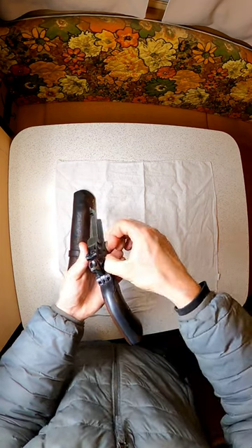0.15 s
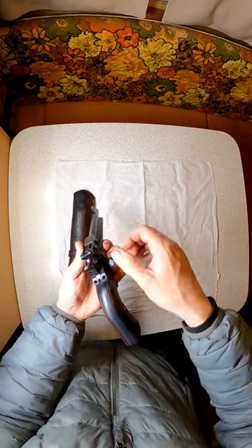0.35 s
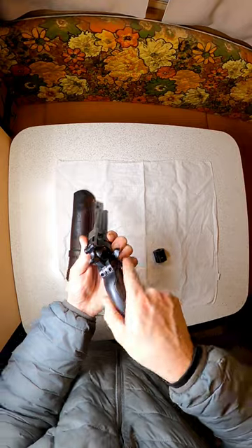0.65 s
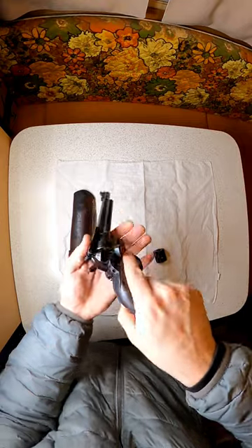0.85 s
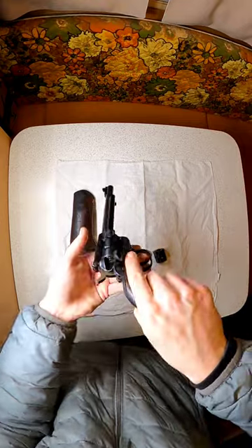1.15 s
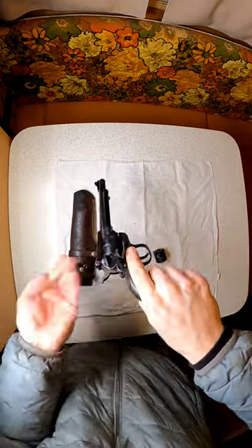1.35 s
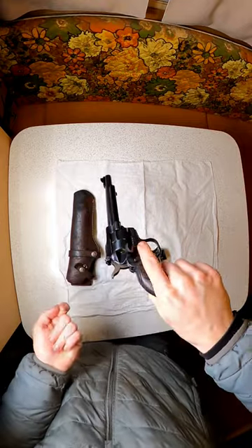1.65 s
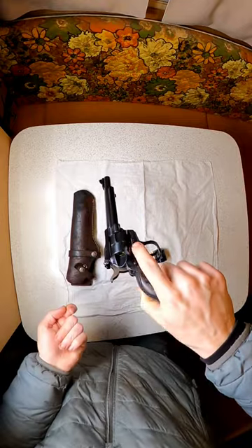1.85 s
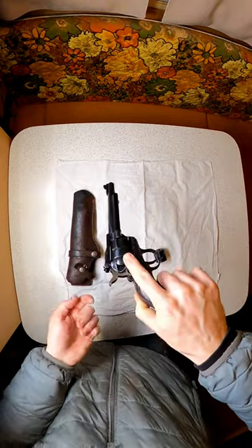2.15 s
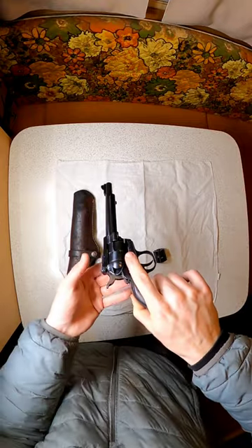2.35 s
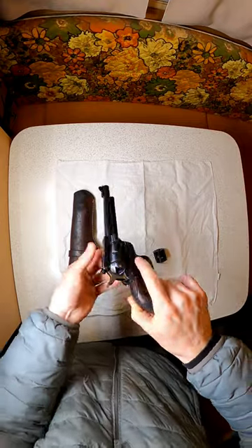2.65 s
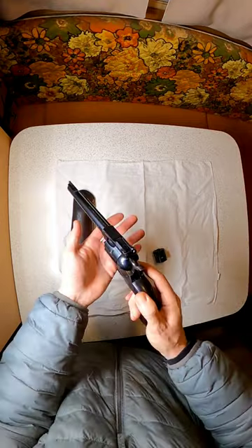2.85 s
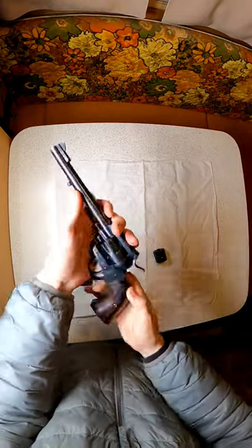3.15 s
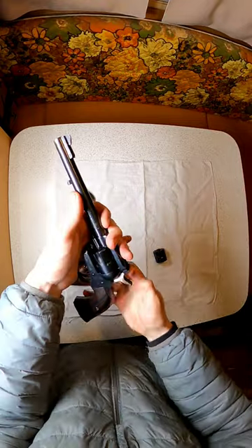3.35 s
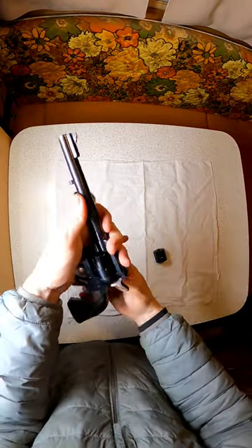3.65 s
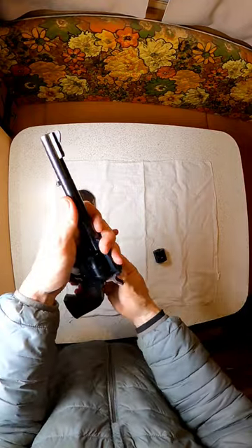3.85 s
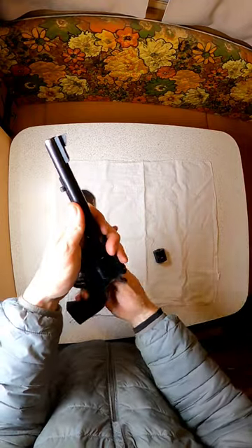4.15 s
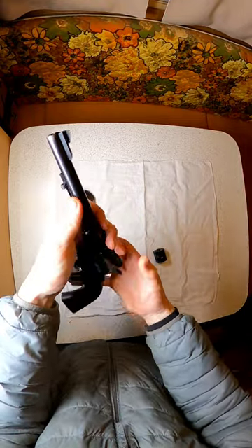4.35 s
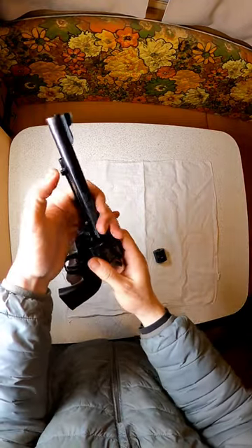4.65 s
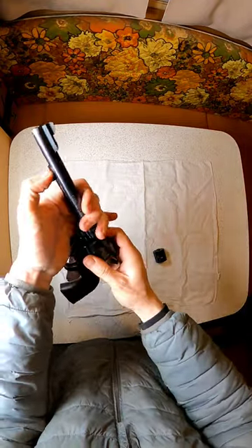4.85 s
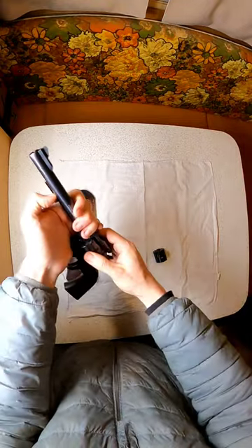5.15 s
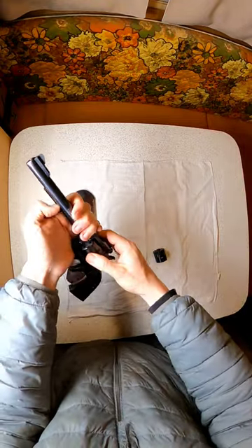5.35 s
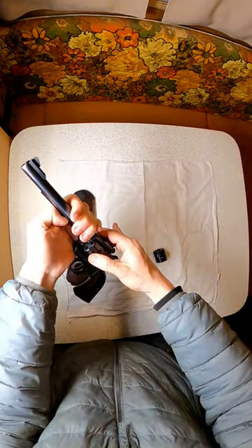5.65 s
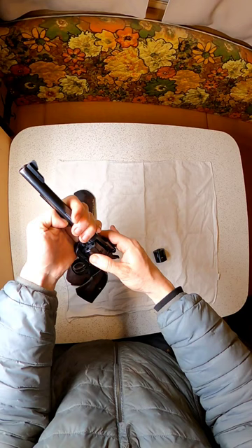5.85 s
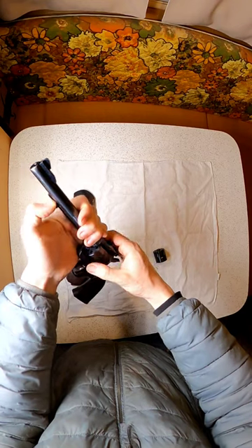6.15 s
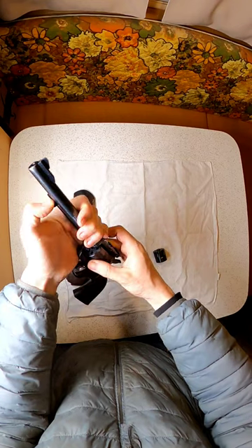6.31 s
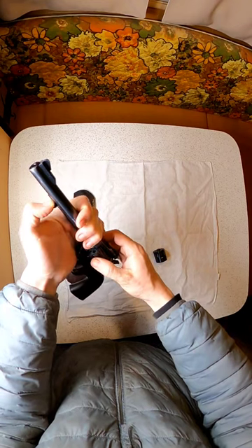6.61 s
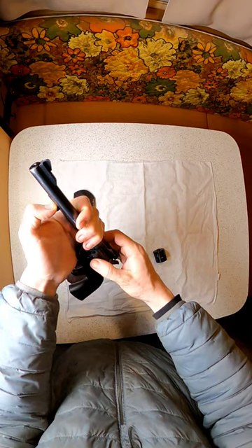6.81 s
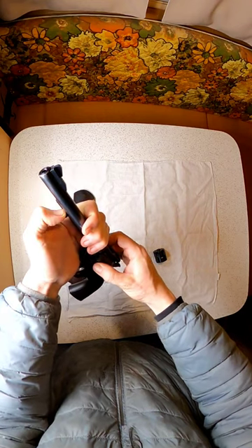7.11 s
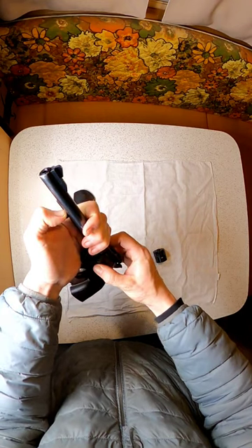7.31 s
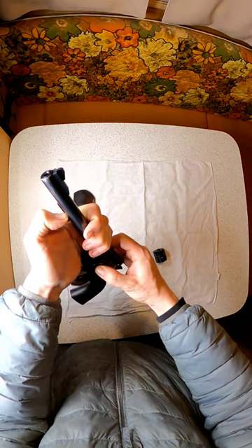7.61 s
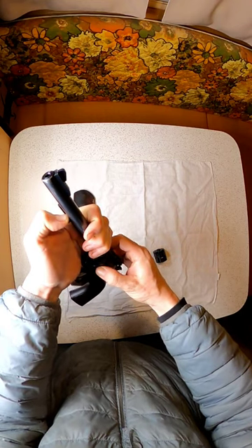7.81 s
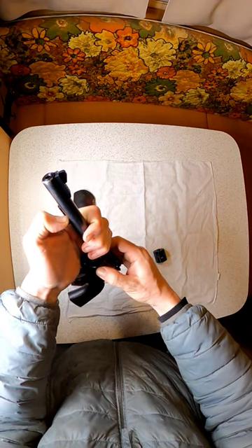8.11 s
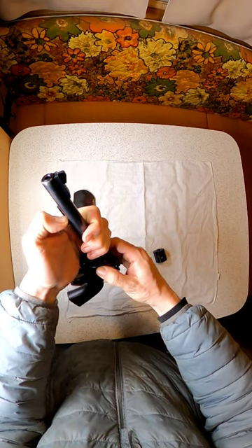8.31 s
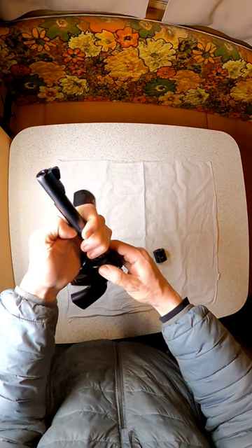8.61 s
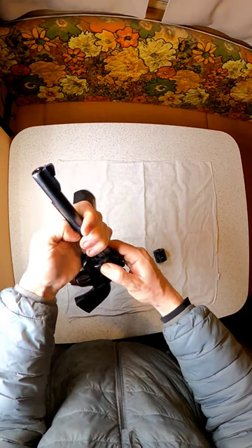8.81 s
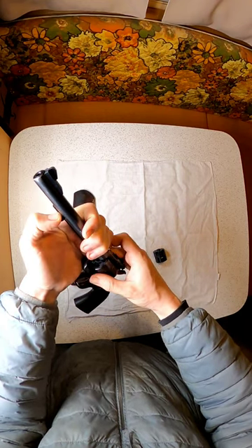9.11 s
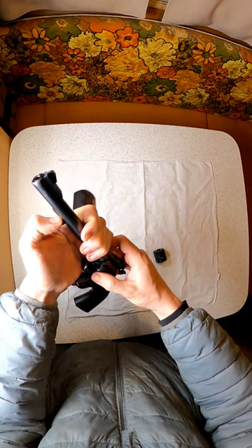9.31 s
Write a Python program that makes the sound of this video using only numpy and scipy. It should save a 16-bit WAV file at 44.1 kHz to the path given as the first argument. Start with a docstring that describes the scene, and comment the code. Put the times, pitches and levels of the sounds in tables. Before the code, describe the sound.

A revolver's cylinder spins with rapid ticks, then its steel action snaps and clicks close by, amid soft sleeve rustles and table knocks.

```python
"""Padded sleeves rustle, then a revolver's cylinder is spun and ticks against its pawl as it coasts.
The single-action gun is handled over a table in a small, soft room, close to a head-worn stereo microphone.
Sprung steel parts snap home and ring, fingers squeak on the metal, hard knocks set the table top booming.
Behind it an engine drones through the walls, over street rumble, a rush of air and an appliance's hum."""
import sys
import numpy as np
from scipy import signal
from scipy.fft import rfft, irfft, next_fast_len
from scipy.io import wavfile
from scipy.ndimage import map_coordinates

SR = 44100
rng = np.random.default_rng(int(sys.argv[2]) if len(sys.argv) > 2 else 0)


def wav_out(sig):
    """Save sig, one row per channel (or a flat mono array), as 16-bit PCM at SR to the path in sys.argv[1]."""
    wavfile.write(sys.argv[1], SR, np.round(np.clip(np.atleast_2d(sig).T, -1, 1) * 32767).astype(np.int16))


N = 417627
HIT_SAMPLES = 16384
# stereo width of the noises and the table's clatter: frequency_hz, side_minus_mid_db
SCENE_WIDTH = [(100, -12.5), (600, -17), (1200, -6.5), (2500, -1.5), (5000, -5), (8000, -3.5),
               (13000, -3.5)]


def ratchet(pawl_db=5.5, scatter_db=1.5):
    """The pawl drops into each passing notch: weaker, thinner and crisper as the cylinder slows."""
    # the cylinder is flicked up to speed and coasts: time_s, notches_per_s
    spin = [(1.3617, 25.6), (1.4157, 97.7), (1.6, 33.15), (1.69, 5.5)]
    # the cylinder's modes: pitch_hz, level_db, t60_s
    cylinder_modes = [(2425, -10, 0.027), (3480, -13, .07), (3800, -8, 0.047), (4197, -7.5, 0.04),
                      (5007, -1, 0.023), (5400, -15, 0.042), (6390, 3.5, 0.046), (8050, -17.5, .07),
                      (8670, -3.5, 0.039), (11800, -10.5, 0.071)]
    out, steel = np.zeros((2, N)), steelwork()
    when, rate = np.transpose(spin)
    t = np.arange(when[0], when[-1], 1 / SR)
    speed = np.interp(t, when, rate)
    notches = np.cumsum(speed) / SR
    for i in np.searchsorted(notches, np.arange(notches[-1])):
        slowness = np.log10(rate.max() / speed[i])  # 0 at full speed, 1 at a tenth of it
        db = pawl_db - 1.5 * slowness + scatter_db * rng.standard_normal()
        edge_db, thin_db = -3.5 + 5 * slowness, 5 * slowness
        body = [(100, -24), (480, -21), (700, -6), (1250, -5), (2300, 2.5)]
        colour = [(hz, level - thin_db) for hz, level in body]
        colour += [(3000, -6.5), (4000, 5), (5200, edge_db - 3), (6500, edge_db), (8000, edge_db - 5),
                   (9300, edge_db + 1), (12500, edge_db - 12), (15000, -31)]
        crack = burst(t60=.007, hold_s=.0029)
        tick = click(colour, crack, [(cylinder_modes, -6)], steel, steel_db=-7, room_db=-20)
        add(out, t[i], amp(db) * tick)
    return out


def whirr():
    """The spinning cylinder rattles on its pin, a fine rasp between the pawl's ticks."""
    # the rattle's swell: time_s, level_db
    swell = [(1.375, -110), (1.405, -48.5), (1.485, -31.5), (1.585, -37.5), (1.66, -110)]
    rasp = noise([(500, -26), (3800, -1), (7000, -7.5), (15000, -32)], crinkle_db=4)
    return amp(curves(swell)[0]) * rasp


def action():
    """Gate, hammer and cylinder stop snap home and rebound twice, evenly spaced and ever weaker."""
    # sprung parts striking; body, edge and top shape the low mids, treble and high treble:
    # start_s, level_db, body_db, edge_db, top_db, contact_t60_s, pitch_hz, ring_db, flight_s, loss_db
    snaps = [(2.047, 10.5, -11.5, 5, -12, 0.0073, 2490, -8, .005, 31),
             (2.5243, 2, -3, 0.5, -8, .022, 2130, -11.5, 0.011, 18),
             (4.105, -8, 3, 14, 1.5, 0.0056, 2395, -5, 0.01, 12.5),
             (5.0385, -13.5, -2, -4, -16, 0.015, 2890, -10, 0.013, 8),
             (5.7585, 8, -4.5, -1, -28, 0.0099, 3310, -12, 0.011, 27),
             (5.762, 11.5, -8.5, -2.5, -18, .015, 3305, -13.5, 0.0096, 8),
             (6.645, 4.5, -8.5, 1, -3.5, 0.029, 3220, -8, 0.012, 12),
             (6.908, -10, -6.5, 0.5, -5.5, 0.0083, 7110, -10, 0.023, 17),
             (8.4212, -6, -3, -14, -35, .012, 3463, -21, .006, 22),
             (8.4275, -6, -1, -2.5, -16, .012, 2880, -18, 0.0091, 20),
             (8.489, 8.5, -4.5, -5, -18.5, .01, 6620, -16, 0.0091, 11),
             (8.504, 1, -13, 0, -24, .012, 2990, -10, 0.012, 13.5),
             (8.85, 11, -2, -2, -30.5, 0.029, 3380, -9, .0112, 1.5),
             (8.929, -8, 6.5, -18.5, -29, 0.095, 1400, -16, .01, 20),
             (9.0502, 1, 0, -16, -51, 0.021, 1650, -12.5, 0.0083, 9.5),
             (9.4613, 4.5, -13.5, -4.5, -8, 0.02, 3310, -11.5, 0.011, 20)]
    out = np.zeros((2, N))
    for start_s, db, body_db, edge_db, top_db, t60, pitch_hz, ring_db, flight_s, loss_db in snaps:
        colour = [(100, body_db - 11), (520, body_db - 13.5), (720, body_db - 2), (920, body_db - 7.5),
                  (1300, body_db + 2), (2200, 1), (3600, -1.1), (5200, edge_db - .5), (7400, edge_db),
                  (11000, top_db), (13000, top_db - 7.5), (15000, top_db - 24)]
        for bounce in range(3):
            at_s = start_s + bounce * flight_s
            if at_s < N / SR:
                add(out, at_s, amp(db - bounce * loss_db) * contact(colour, t60, pitch_hz, ring_db))
    return out


def ticks():
    """Faint, brief ticks; the one at 2.044 s is a short, bright lead-in to the loud snap."""
    # the ticks: start_s, level_db, pitch_hz
    tick_events = [(2.0034, -28, 2870), (2.029, -22, 2347), (2.0443, -9.5, 6230), (3.922, -30, 1940),
                   (5.0146, -20.5, 3050), (5.2678, -25.5, 3425), (5.5462, -21.5, 2560),
                   (5.673, -26.5, 7080), (6.373, -24, 3750), (8.732, -28, 3190), (8.841, -23, 3420)]
    # spectrum of a tick: frequency_hz, level_db
    colour = [(100, -17), (520, -18.5), (720, -8.5), (1300, -5.5), (2200, -1), (3600, 2.5), (5200, -7),
              (7400, -8.5), (11000, -22), (15000, -42.5)]
    out = np.zeros((2, N))
    for start_s, db, pitch_hz in tick_events:
        add(out, start_s, amp(db) * contact(colour, .012, pitch_hz, ring_db=-11))
    return out


def contact(colour, t60, pitch_hz, ring_db, frame_db=-16, part_t60=.019):
    """A struck part rings briefly and shakes the frame."""
    # the frame's modes: pitch_hz, level_db, t60_s
    frame_modes = [(695, 0.5, .07), (1370, -7, 0.058), (1840, -11.5, 0.064), (1766, -7.5, 0.12),
                   (2030, -15, .13), (2357, -8, 0.14), (2900, -2.5, 0.089), (3125, -2.5, 0.11),
                   (3460, -10, 0.085), (3460, -11.5, 0.087), (4190, -9.5, .09), (4400, -9, .1),
                   (6330, -9.5, .07), (6220, 1.5, 0.047), (6710, -6.5, 0.1), (6940, -3.5, .07)]
    steel = steelwork()  # each blow finds other modes in the gripped gun
    bodies = [(frame_modes, frame_db), ([(pitch_hz, 0, part_t60)], ring_db)]
    return click(colour, burst(t60), bodies, steel, steel_db=-10.5, room_db=-20.5)


def click(colour, crack, bodies, steel, steel_db, room_db):
    """Steel meets steel near the microphone: a crack, ringing steelwork and bodies, a faint room tail."""
    # stereo width of the gun: frequency_hz, side_minus_mid_db
    gun_width = [(100, -13), (600, -16.5), (1200, -7.5), (2200, -11.5), (4000, -8), (8000, -1.5),
                 (13000, -1.5)]
    shimmer = signal.fftconvolve(crack, steel, axes=1)[:, :HIT_SAMPLES]
    direct = crack + amp(steel_db) * shimmer / np.linalg.norm(shimmer[0])
    for modes, db in bodies:
        tone = ring(modes)
        mid_side = [[1], [rng.uniform(-1, 1)]]
        direct += amp(db) * tone / np.linalg.norm(tone) * mid_side
    ahead = amp([[0], [-6]])  # sound from straight ahead has less side than the room
    return stereo(direct * ahead + amp(room_db) * room_tail(), colour, gun_width)


def steelwork(t60=.07, count=80):
    """The many weak modes of barrel, pins and springs, as mid and side."""
    hz = 700 + 13000 * (np.arange(count) + rng.random(count))[:, None] / count
    t = np.arange(HIT_SAMPLES // 4) / SR
    modes = np.sin(2 * np.pi * hz * t) * amp(-60 * t / t60)
    return rng.choice([-1, 1], (2, count)) @ modes


def jolts():
    """The hand absorbs each jolt of the gun: one low push that dies at once."""
    # the pushes: start_s, level_db, length_s
    pushes = [(1.408, -30, 0.0025), (1.449, -35.5, 0.0035), (2.0485, -20, 0.0042), (2.524, -36.5, 0.0044),
              (8.876, -36.5, 0.0049)]
    out = np.zeros(N)
    for start_s, db, length_s in pushes:
        progress = np.arange(HIT_SAMPLES) / SR / length_s
        add(out, start_s, -amp(db) * np.sin(np.pi * progress) * np.exp(1 - 2 * progress))
    return out


def table_top(rise_s=.003):
    """Hard knocks set the table top booming; its dense upper modes merge into a short clatter."""
    # knocks that reach the table: start_s, boom_db, clatter_db
    knocks = [(5.763, -30.5, 5.5), (5.812, -52, -12.5), (8.85, -38, 9), (8.871, -30.5, 7),
              (8.931, -52, -6.5), (9.05, -37.5, 1)]
    # the top's low modes: pitch_hz, level_db, t60_s
    top_modes = [(172, 0, .46), (225, -1, .34), (379, -6, .21), (495, -14, .21), (660, -13, .2),
                 (980, -12, .23), (1152, -13, .19), (1373, -14, .15)]
    # spectrum of the clatter: frequency_hz, level_db
    clatter_colour = [(100, -18.5), (250, -1.5), (400, 5), (580, -9.5), (820, -5), (1100, 6), (2000, -0.5),
                      (4000, -10.5), (9000, -39.5)]
    out, t = np.zeros((2, N)), np.arange(HIT_SAMPLES) / SR
    for start_s, boom_db, clatter_db in knocks:
        clatter = amp(clatter_db) * stereo(burst(t60=.14) * [[1], [.5]], clatter_colour)
        boom = amp(boom_db) * ring(top_modes, scatter_db=.5)
        add(out, start_s, (boom + clatter) * (1 - np.exp(-t / rise_s)))
    return out


def finger_squeaks(jitter_hz=260):
    """A finger sticks and slips on the steel: a fuzzy, gliding squeak."""
    # skin sliding on steel: start_s, length_s, start_hz, end_hz, level_db
    slides = [(1.022, 0.12, 5000, 4200, -63), (1.104, 0.077, 4800, 7040, -69),
              (2.26, 0.098, 2800, 3730, -58), (2.352, 0.083, 3400, 3400, -67),
              (5.826, 0.155, 4650, 4550, -73.5), (5.967, 0.084, 3020, 3940, -64)]
    out = np.zeros(N)
    for start_s, length_s, start_hz, end_hz, db in slides:
        progress = np.linspace(0, 1, int(length_s * SR))
        hz = start_hz + (end_hz - start_hz) * progress + jitter_hz * wobble(900)[:len(progress)]
        squeak = np.sqrt(2) * np.sin(2 * np.pi * np.cumsum(hz) / SR)
        add(out, start_s, amp(db) * np.sin(np.pi * progress) * squeak)
    return out


def sleeves():
    """Padded nylon rubs and crinkles; each stroke swells and fades with the speed of the arm."""
    # arm strokes: start_s, length_s, rub_db, hiss_db
    strokes = [(0.25, 0.44, -63, -62.5), (0.54, 0.36, -58.5, -60), (0.802, .45, -63.5, -61.5),
               (1.156, 0.79, -70.5, -64), (2.11, .43, -60, -59), (2.665, 0.64, -57.5, -59),
               (3.06, 0.33, -71, -59.5), (3, 0.89, -53.5, -60.5), (3.721, 0.96, -67.5, -67),
               (4.39, 0.53, -56.5, -61), (4.749, 0.65, -61.5, -63), (5.25, 0.78, -66.5, -65),
               (5.91, 0.27, -74.5, -66), (6.26, 0.71, -78.5, -73), (7.591, 0.73, -65, -73),
               (8.506, 0.68, -65.5, -62.5)]
    # spectra of the rubbing and the nylon's hiss: frequency_hz, level_db
    rub_colour = [(150, -30.5), (400, -3), (750, -6.5), (1100, -0.5), (1700, -1.5), (2500, -6.5),
                  (4000, -21.5), (9000, -51.5)]
    hiss_colour = [(800, -30.5), (2000, -1), (3300, 1.5), (5000, -0.5), (6500, 1.5), (8600, -8),
                   (9700, -14), (12800, -18.5), (14000, -45.5)]
    power = np.zeros((2, N))
    for start_s, length_s, rub_db, hiss_db in strokes:
        add(power, start_s, amp([[rub_db], [hiss_db]]) ** 2 * np.hanning(int(length_s * SR)))
    resting = amp([[-67], [-78]])  # rub and hiss between strokes
    rub, hiss = np.sqrt(power + resting ** 2) * amp(2.2 * wobble(22))
    return rub * noise(rub_colour) + hiss * noise(hiss_colour, crinkle_db=1)


def engine():
    """Four low firing orders pass the walls; they swell and sink as the revs rise, sag and settle."""
    # the engine outside: time_s, firing_hz, firing_db, overtone_db
    revs = [(.7, 54.2, -71.5, -79.5), (1.2, 53.16, -70.5, -56), (1.45, 50.4, -65, -55),
            (2.2, 55, -55.5, -52), (2.58, 56.57, -42.5, -42.5), (2.72, 57.19, -54, -47.5),
            (2.81, 56.9, -61, -59), (2.97, 57.55, -57, -46.5), (3.2, 58.32, -82, -45.5),
            (3.55, 56.77, -49.5, -43.5), (3.9, 53.07, -38.5, -39.5), (4.3, 48.54, -52.5, -42.5),
            (4.6, 44.94, -75.5, -46), (5.1, 42.58, -54, -50.5), (5.5, 41.3, -70, -55),
            (5.7, 41.05, -73.5, -71.5), (6.08, 40.27, -65.5, -53), (6.3, 39.4, -66, -71),
            (7.45, 40, -66, -76.5), (7.6, 41, -52, -71.5), (8.45, 40.6, -51, -59.5), (8.8, 40.27, -70, -77)]
    # second, third and fourth order: offset_db
    overtones = [0, -3, -3.2]
    # the room's low resonances, through which the overtones sweep: frequency_hz, gain_db
    room_gain = [(78, 5), (85, 5.5), (88, -9.5), (98, 6), (102, -5.5), (108, 1), (113, -5), (115.5, 7),
                 (125, -15), (143, -6.5), (155, 2), (175, 0.5), (185, -12), (196, -4), (208, -20.5)]
    hz, firing_db, overtone_db = curves(revs)
    levels = [firing_db] + [overtone_db + db + along(room_gain, k * hz) for k, db in enumerate(overtones, 2)]
    phase = 2 * np.pi * np.cumsum(hz * (1 + .003 * wobble(12))) / SR
    orders = [amp(db + 1.9 * wobble(14)) * np.sin(k * phase) for k, db in enumerate(levels, 1)]
    return np.sqrt(2) * sum(orders)


def room_tail():
    """The soft room's short, diffuse tail, of energy 1; its treble dies first."""
    # the room's decay: frequency_hz, t60_s
    decay = [(200, .3), (1000, 0.1), (3000, 0.15), (7000, 0.14), (13000, 0.09)]
    hz, t, spectrum = signal.stft(rng.standard_normal((2, HIT_SAMPLES)), SR, nperseg=256)
    spectrum *= amp(-60 * t / along(decay, hz)[:, None])
    tail = signal.istft(spectrum, SR)[1][:, :HIT_SAMPLES]
    tail *= 1 - np.exp(-np.arange(HIT_SAMPLES) / SR / .005)
    return tail / np.linalg.norm(tail[0])


def room_tone():
    """Street rumble, a low rush of air and an appliance's wavering hum."""
    # drift of the street and the air: time_s, rumble_db, rush_db
    drift = [(0, -60, -62), (.6, -67, -54.5), (1.15, -64.5, -52), (1.5, -57, -59), (2.6, -53, -62),
             (3.2, -50.5, -56.5), (4.3, -48, -55.5), (4.6, -53, -57.5), (6.8, -64.5, -60.5),
             (8, -57.5, -58), (9.47, -61, -61.5)]
    # their spectra: frequency_hz, level_db
    rumble_colour = [(10, -7), (25, -3), (45, 1), (80, -0.5), (120, -8), (180, -5.5), (240, -13),
                     (500, -33), (1200, -74.5)]
    rush_colour = [(60, -23.5), (130, -9.5), (185, -3), (245, -7), (320, 2.5), (375, -6.5), (440, -16.5),
                   (530, -15.5), (800, -22), (940, -18), (1200, -18), (1600, -16.5), (2500, -40),
                   (9000, -62.5), (15000, -82)]
    # the appliance's tones: pitch_hz, level_db
    hum_tones = [(183, -67.5), (323, -63), (926, -75.5)]
    rumble_db, rush_db = curves(drift)
    t = np.arange(N) / SR
    hum = np.sqrt(2) * sum(amp(db) * np.sin(2 * np.pi * hz * t + .16 * wobble(5)) for hz, db in hum_tones)
    return amp(rumble_db) * noise(rumble_colour) + amp(rush_db) * noise(rush_colour) + hum


def ring(modes, scatter_db=2):
    """Damped modes, struck at new strengths each time."""
    t = np.arange(HIT_SAMPLES) / SR
    hz, db, t60 = np.transpose(modes)[:, :, None]
    envelopes = amp(db + scatter_db * rng.standard_normal(hz.shape) - 60 * t / t60)
    return np.sum(envelopes * np.sin(2 * np.pi * (hz * t + rng.random(hz.shape))), 0)


def burst(t60, hold_s=0):
    """Two unrelated rattles of micro-contacts that chatter on, then die; each of energy 1."""
    dying_s = np.maximum(np.arange(HIT_SAMPLES) / SR - hold_s, 0)
    rattle = rng.standard_normal((2, HIT_SAMPLES)) * amp(-60 * dying_s / t60)
    return rattle / np.linalg.norm(rattle, axis=1, keepdims=True)


def noise(colour, crinkle_db=0):
    """Stereo noise of rms 1; crinkle breaks it into tiny grains."""
    pair = rng.standard_normal((2, next_fast_len(N)))
    pair[:, :N] *= amp(crinkle_db * wobble(700))
    coloured = stereo(pair, colour)[:, :N]
    return coloured / np.sqrt(np.mean(coloured ** 2))


def stereo(pair, colour, width=SCENE_WIDTH):
    """Colour mid and side into left and right; the microphone's ports agree less in the treble."""
    size = pair.shape[-1]
    hz = np.fft.rfftfreq(size, 1 / SR)
    mid_db = along(colour, hz)
    gains = amp([mid_db, mid_db + along(width, hz)])
    fold = np.zeros(size)  # minimum phase: nothing sounds before its cause
    fold[0], fold[1:size // 2] = 1, 2
    filters = np.exp(rfft(irfft(np.log(gains), size) * fold))
    mid, side = irfft(rfft(pair) * filters, size)
    return np.array([mid + side, mid - side])


def amp(db):
    """Decibels to gain."""
    return 10 ** (np.asarray(db) / 20)


def along(points, hz):
    """Read (frequency_hz, value) points on a log axis."""
    knots_hz, values = np.transpose(points)
    return np.interp(np.log(hz + 1), np.log(knots_hz + 1), values)


def curves(rows):
    """One value per sample for each column after the time."""
    time_s, *columns = np.transpose(rows)
    return [np.interp(np.arange(N) / SR, time_s, column) for column in columns]


def wobble(rate):
    """A smooth random curve, rate knots a second."""
    return map_coordinates(rng.standard_normal(int(N * rate / SR) + 4), [np.arange(N) * rate / SR])


def add(track, start_s, sound):
    """Mix a sound into a track."""
    start = round(start_s * SR)
    track[..., start:start + sound.shape[-1]] += sound[..., :N - start]


def scene():
    """The gun close in front of the microphone, with the room around it."""
    gun = ratchet() + whirr() + action() + ticks() + jolts() * amp([[-3], [2]])  # jolts lean right
    return gun + table_top() + finger_squeaks() + sleeves() + engine() + room_tone()


def record(dry, top_hz=16300):
    """The head-worn camera rounds off the highest peaks and cuts the treble above its band limit."""
    rounded = dry / (1 + dry ** 8) ** (1 / 8)
    return signal.sosfilt(signal.cheby1(14, .2, top_hz, fs=SR, output="sos"), rounded)


dry = scene()
out = record(dry)
wav_out(out)
```